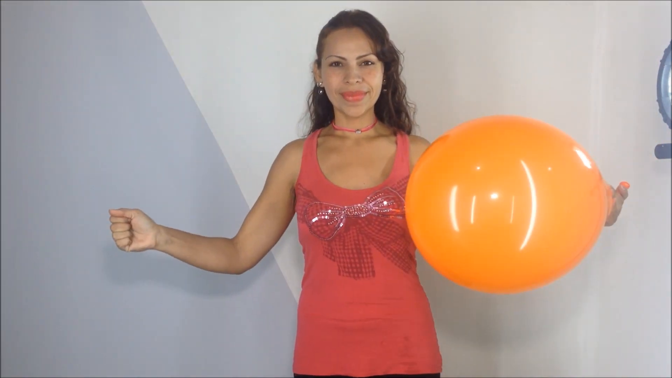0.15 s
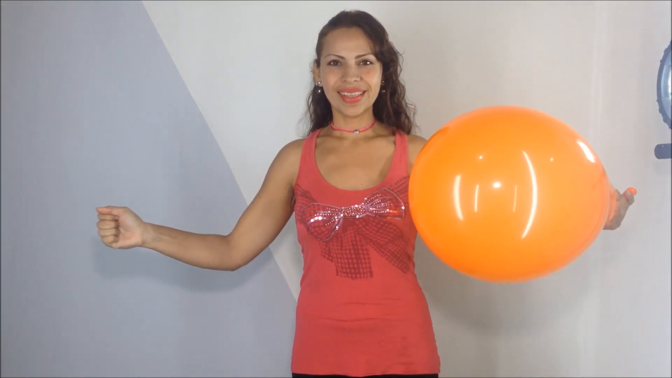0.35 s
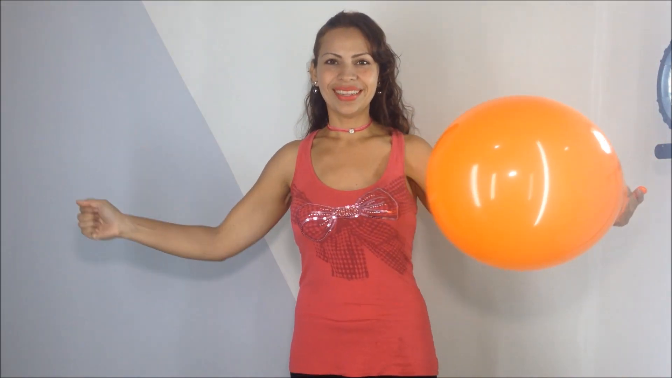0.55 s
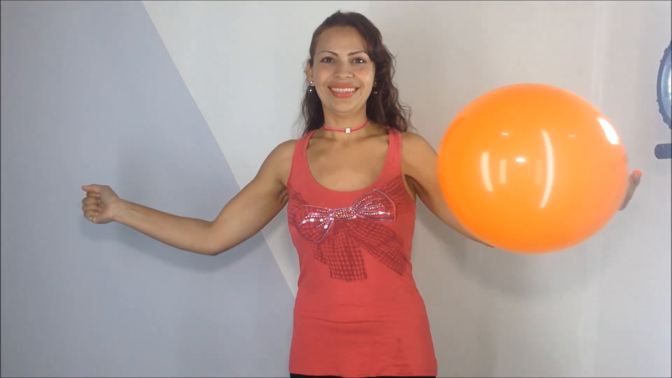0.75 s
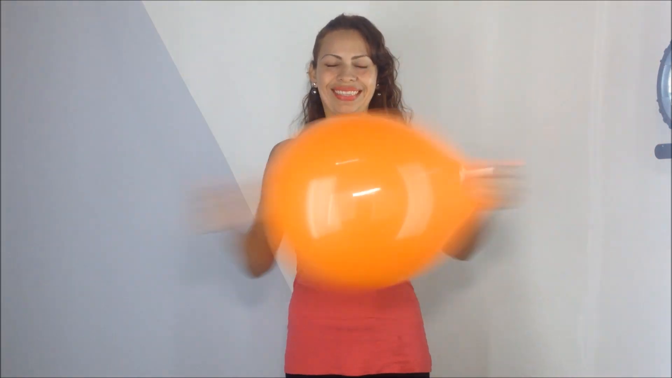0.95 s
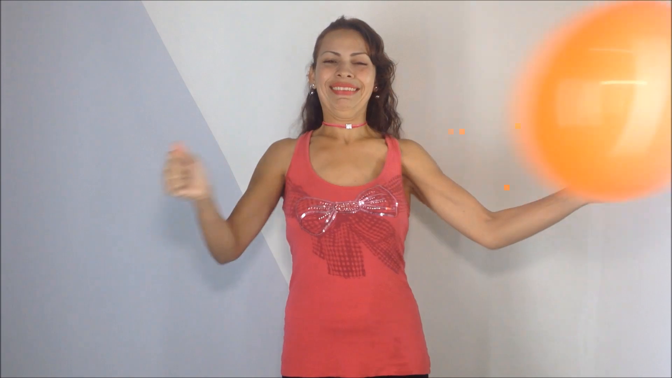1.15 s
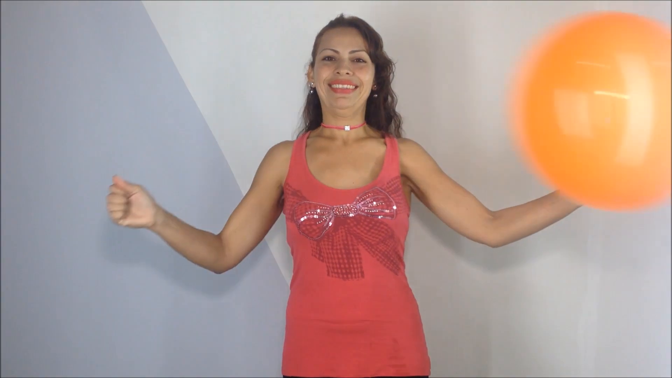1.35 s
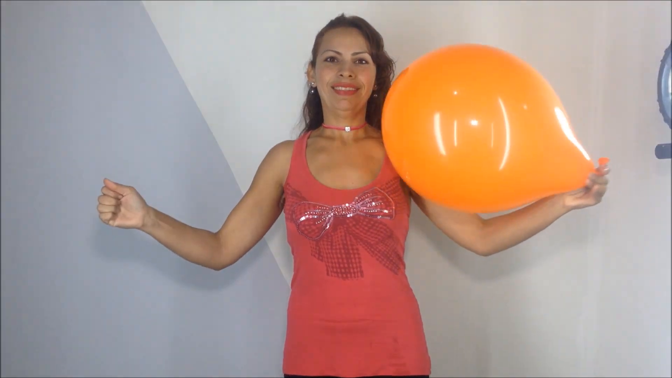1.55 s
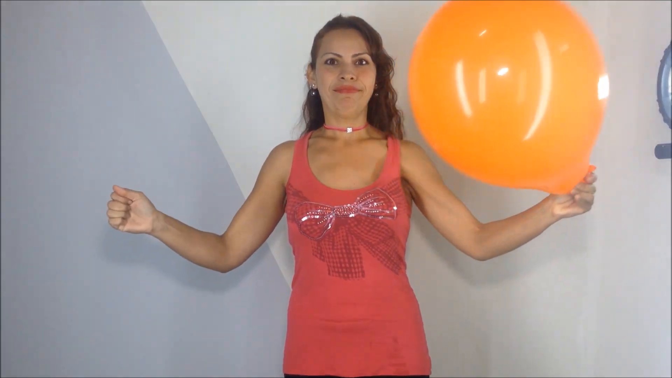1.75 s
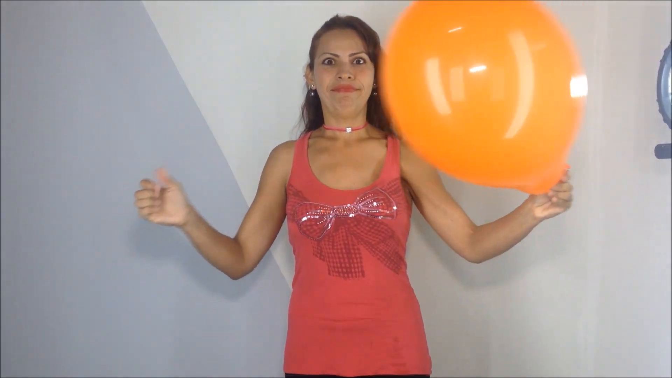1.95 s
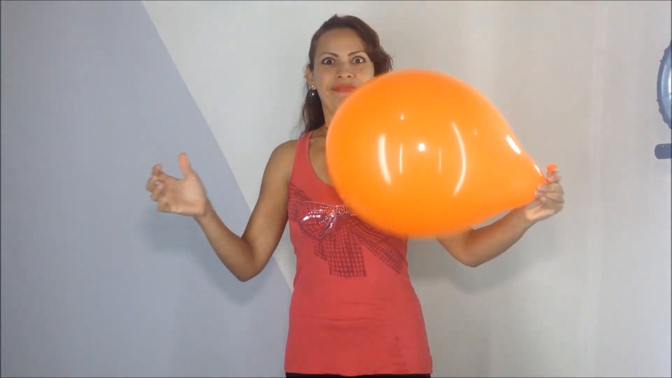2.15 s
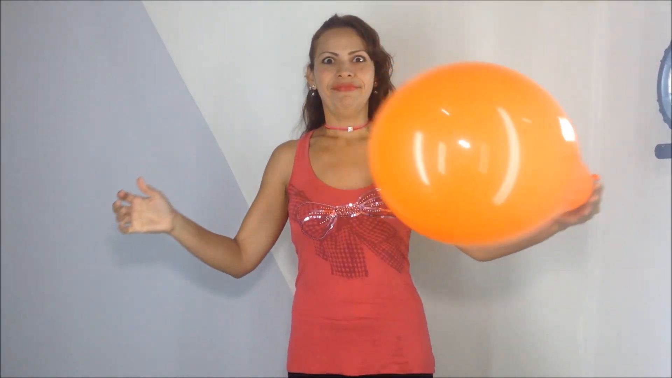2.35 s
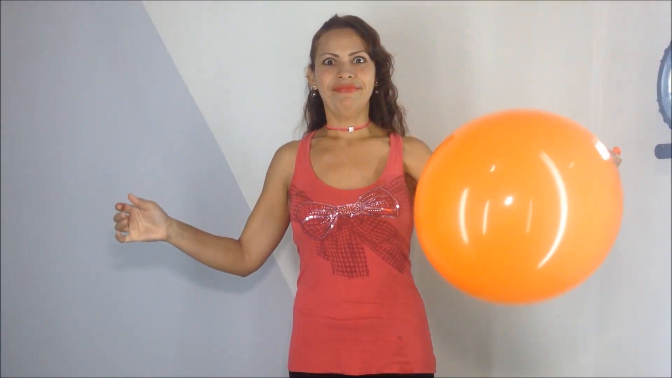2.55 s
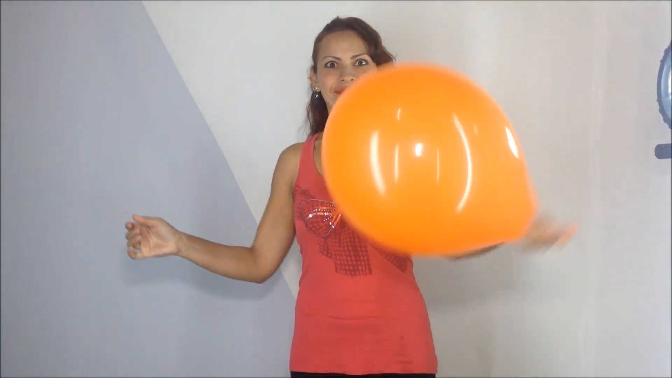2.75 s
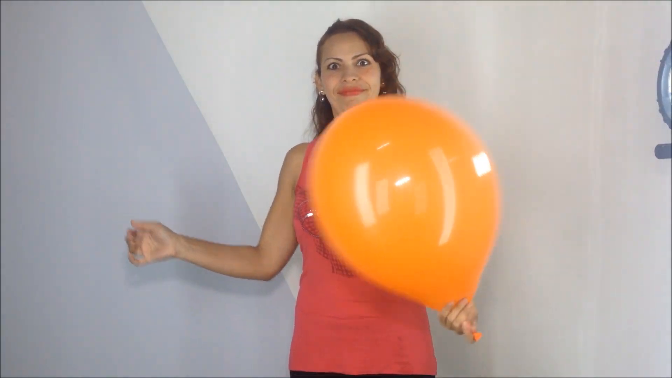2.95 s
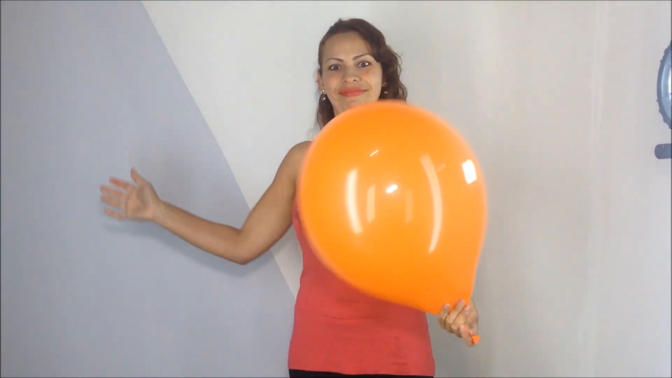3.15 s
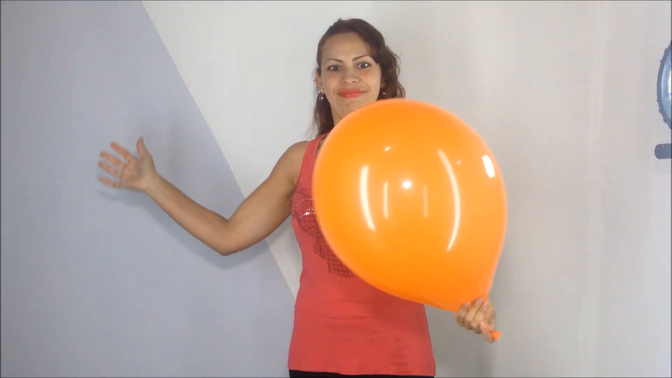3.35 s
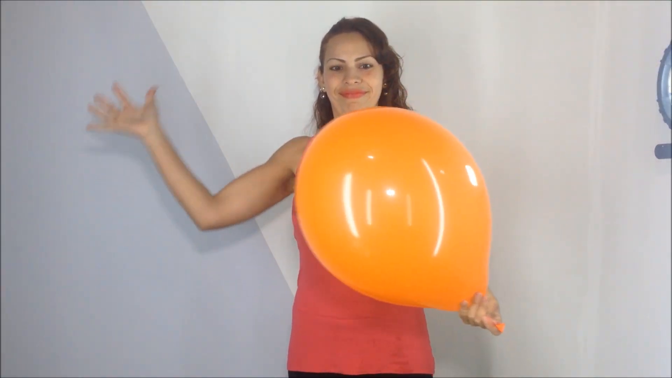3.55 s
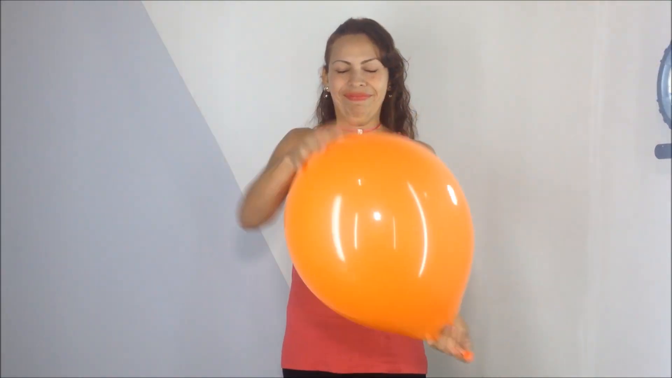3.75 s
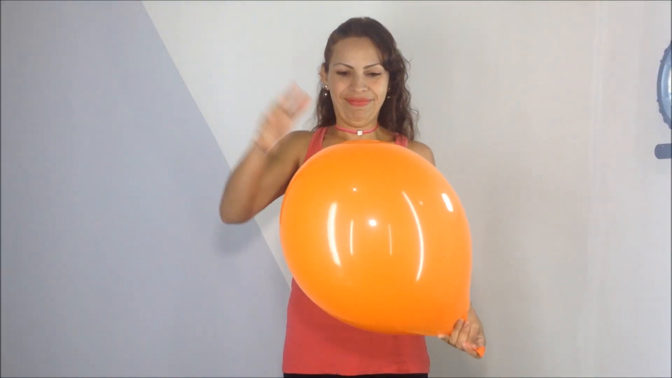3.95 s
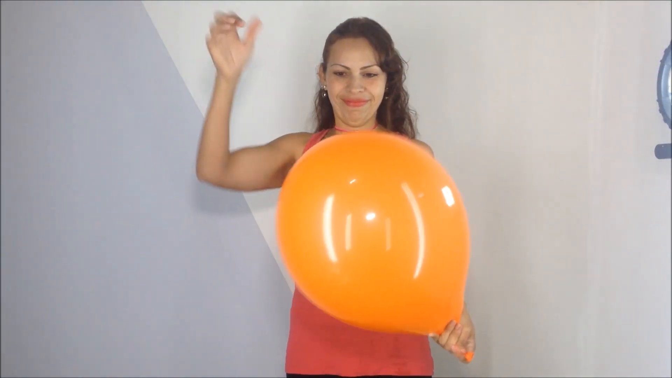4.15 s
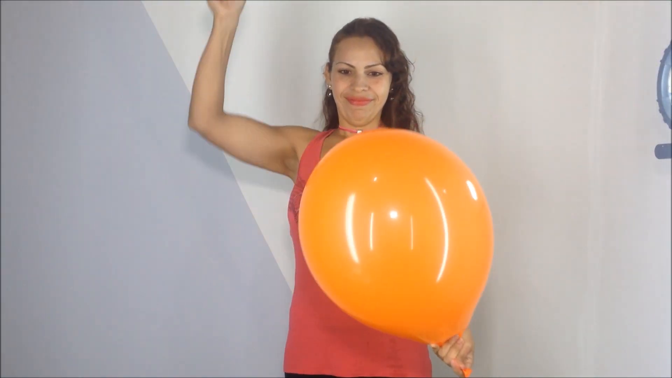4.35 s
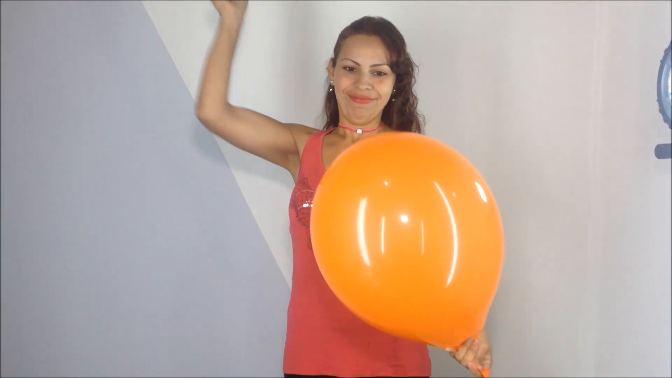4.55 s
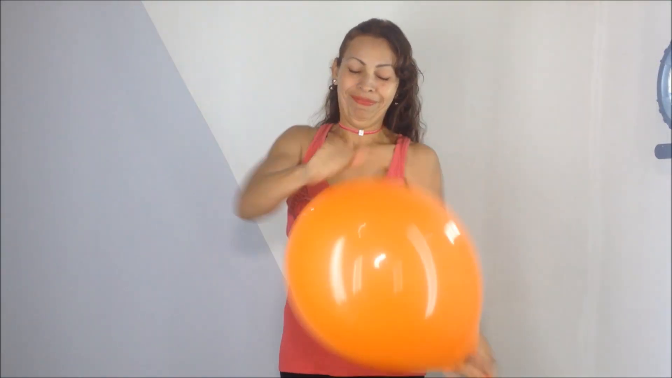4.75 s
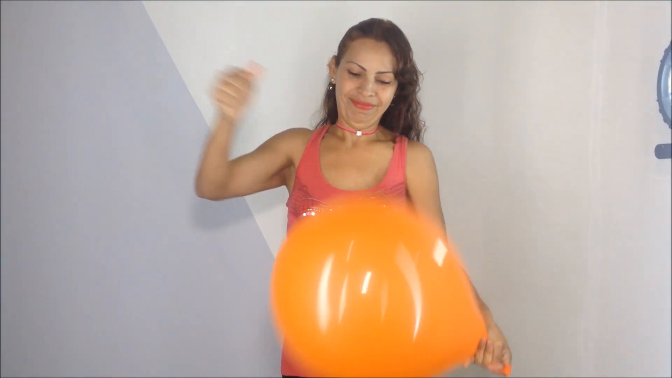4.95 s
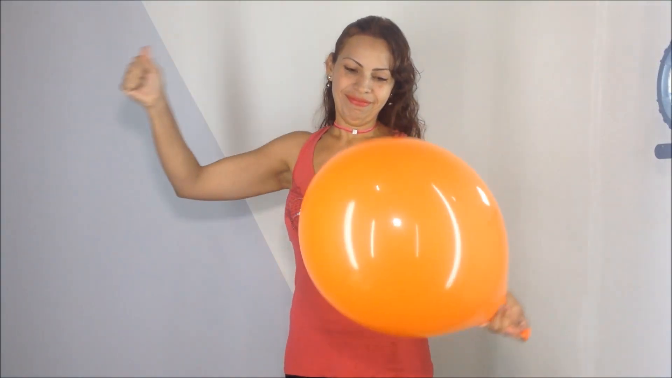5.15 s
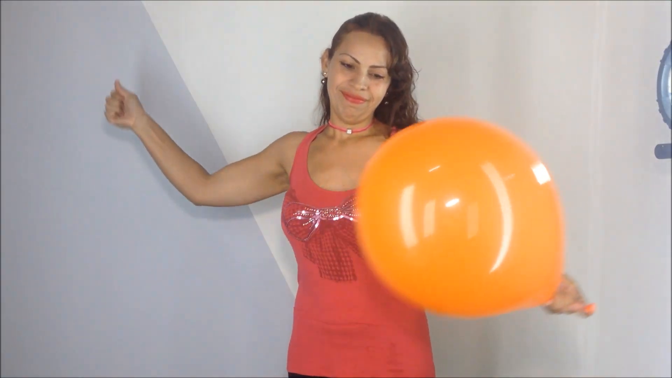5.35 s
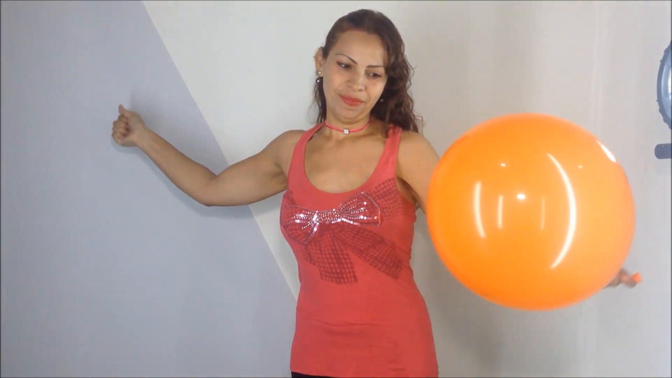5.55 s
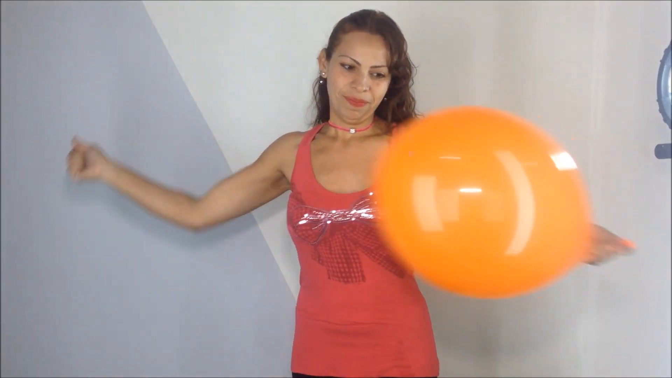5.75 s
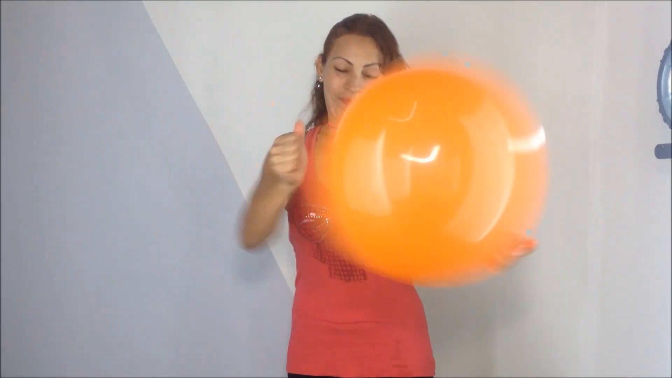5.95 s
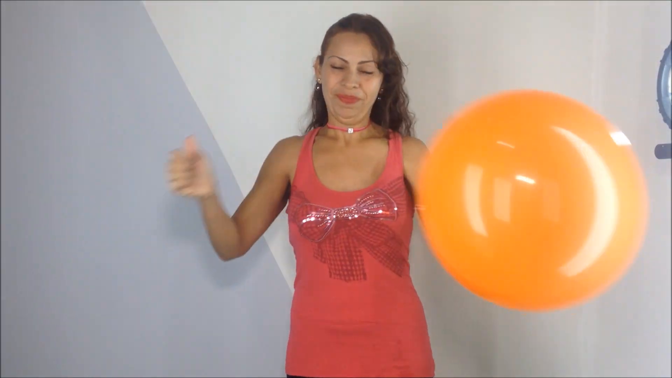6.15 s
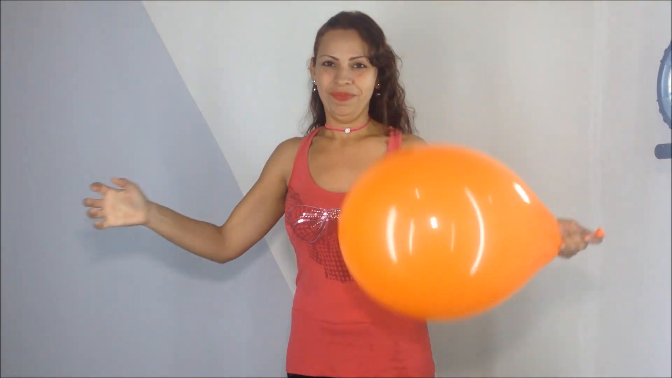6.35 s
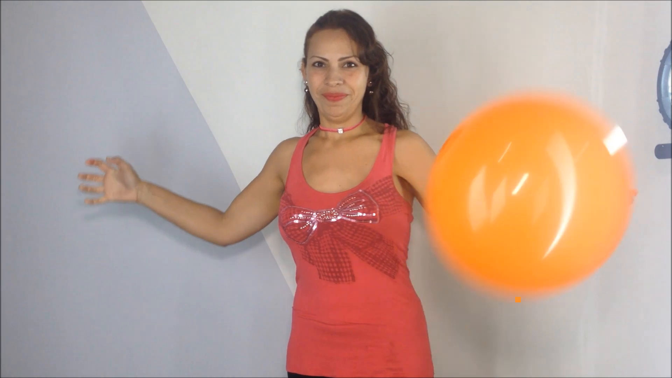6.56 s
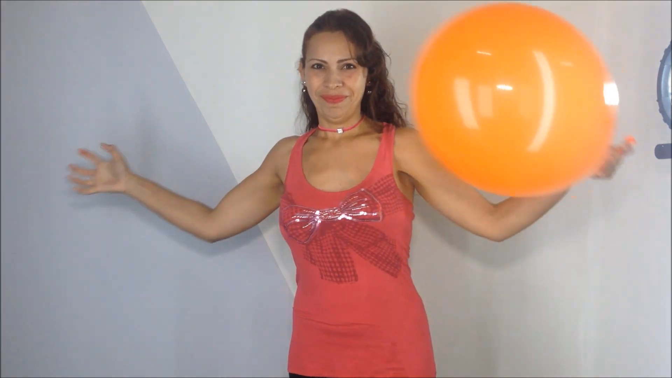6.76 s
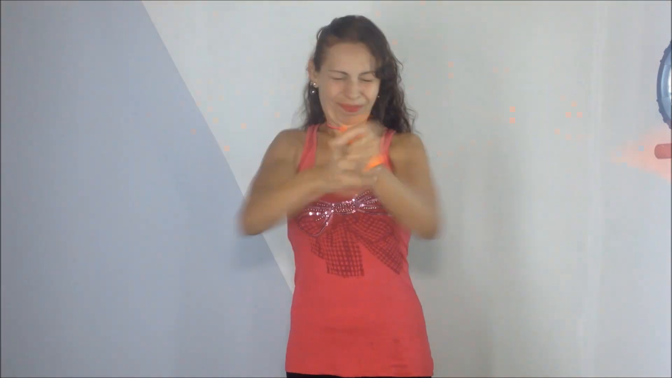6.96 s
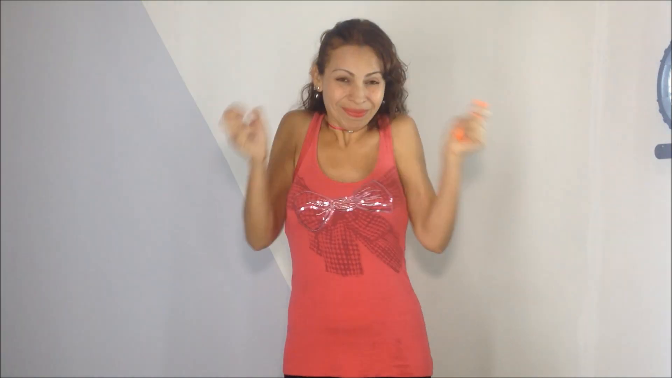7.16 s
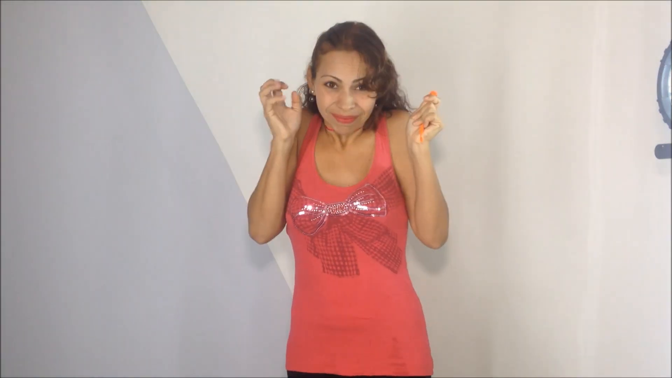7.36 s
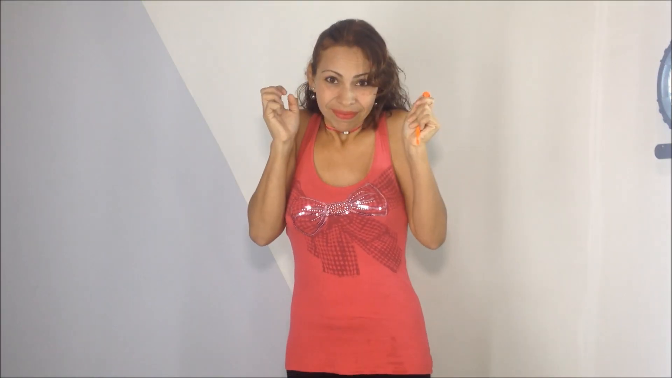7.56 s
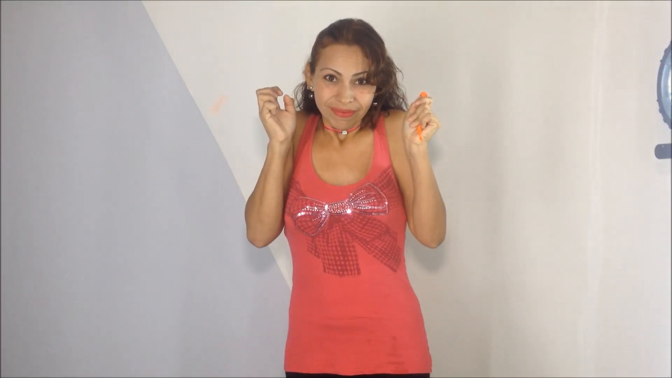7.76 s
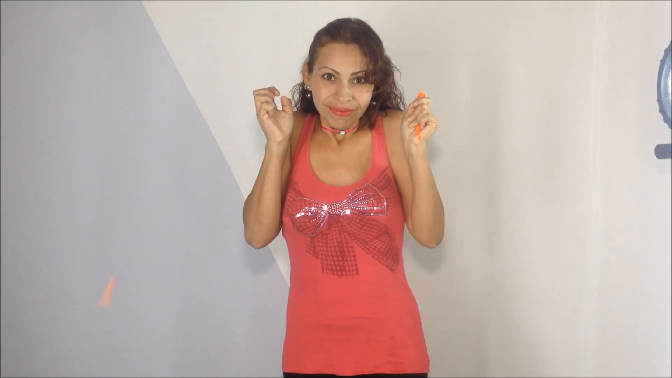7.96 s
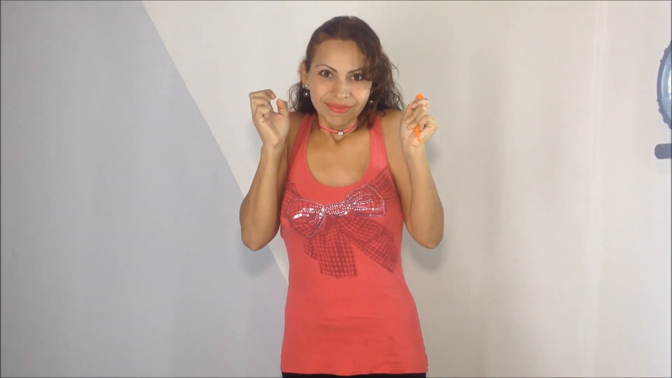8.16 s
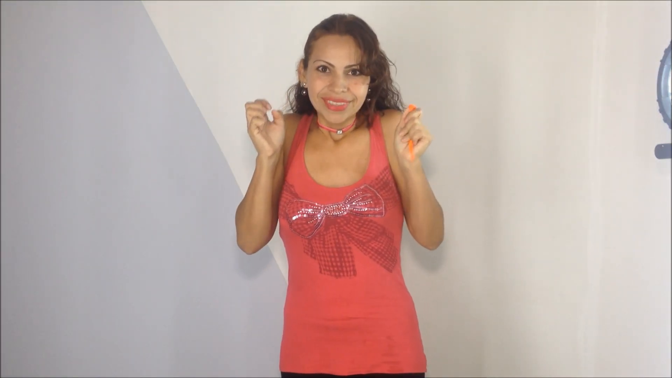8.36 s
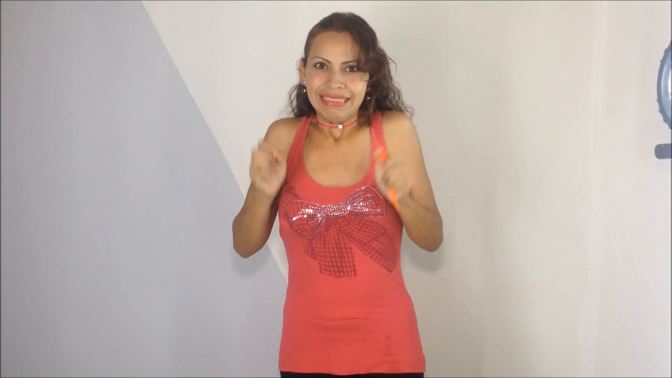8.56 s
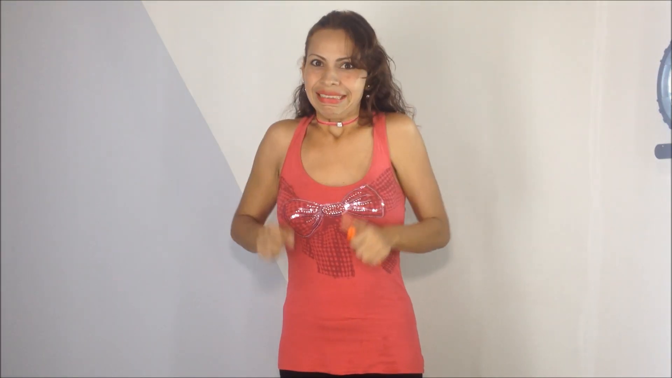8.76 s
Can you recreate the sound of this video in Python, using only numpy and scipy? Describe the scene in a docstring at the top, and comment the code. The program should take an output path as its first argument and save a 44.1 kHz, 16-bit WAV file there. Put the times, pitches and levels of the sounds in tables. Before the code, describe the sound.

In a bare, ringing room, a fist thumps a big balloon once, followed by small rubbery squeaks. Three more hollow punches come about a second apart, then the balloon pops with a loud bang and boom. The microphone, far enough away to catch plenty of echo, distorts and briefly dips in level. A faint clothing rustle follows, while distant traffic murmurs through the walls throughout.

```python
"""A big latex balloon is punched four times in a bare, ringing room and bursts on the fifth blow.
Each punch thuds, slaps and rings the skin; in between, fingers scuff and squeak on the rubber.
The burst cracks, overloads the microphone and pushes its limiter down as a low boom swells up.
Cloth rustles faintly at the end; outside, a far engine drones over the murmur of traffic."""
import sys
import numpy as np
from scipy import signal
from scipy.fft import rfft, irfft
from scipy.io import wavfile
from scipy.ndimage import uniform_filter1d

SR = 44100
rng = np.random.default_rng(int(sys.argv[2]) if len(sys.argv) > 2 else 0)


def transcribe(signal):
    """Save signal, clipped to [-1, 1], as a 16-bit WAV file at the path in sys.argv[1]."""
    frames = np.atleast_2d(signal).T
    limited = np.clip(frames, -1, 1)
    pcm = np.round(limited * 32767).astype(np.int16)
    wavfile.write(sys.argv[1], SR, pcm)


N = 388942
TIME = np.arange(N) / SR


# Knuckles land, the fist sinks in, the balloon rebounds; one row per contact:
# start_s, thud_db, slap_db, low_cut_hz, ring_hz, ring_db, flutter_decay_s
PUNCHES = [(1.101, -22, -9.5, 110, 420, -26, 0.0025), (1.105, -6, -2, 60, 644, -10, 0.0065),
           (1.122, -2, -9, 45, 300, -5, 0.011), (1.150, -3, -3, 45, 206, -2.5, 0.009),
           (1.372, -14.5, -20.5, 110, 195, -17, 0.0074), (3.81, -17, -10, 110, 420, -16, .004),
           (3.8147, -3, 2, 41.6, 548, -8, 0.0067), (3.827, -0.5, -3.5, 42, 734, -7.5, 0.011),
           (3.841, -1.5, -14, 42, 517, -6, 0.013), (3.895, -7.5, -8.5, 60, 284, -11.5, 0.015),
           (4.8034, 1.5, 1.5, 50, 317, -12, 0.0084), (4.822, -0.5, -10.5, 50.3, 347, -2, 0.0077),
           (4.836, -4.5, -10, 50, 223, -5, .008), (4.884, -11, -5, 80, 770, -11, .014),
           (6.008, -8, -2.5, 45, 344, -7, 0.0048), (6.024, -10.5, -11.5, 60, 340, -11, 0.013),
           (6.049, -6.5, -3, 161, 219, -4.5, 0.0068), (6.064, -15, -22, 161, 342, -4.5, 0.0079),
           (6.111, -15.5, -15, 161, 400, -21, 0.0033)]

def punches(hand_db):
    """Every contact of fist, balloon and body sounds in turn; a glancing one lacks bass."""
    out = np.zeros(N)
    for start_s, thud_db, slap_db, low_cut_hz, ring_hz, ring_db, decay_s in PUNCHES:
        hit = contact(thud_db, slap_db, ring_hz, ring_db, decay_s)
        add(out, start_s, low_cut(hit, low_cut_hz))
    return from_db(hand_db) * out


# Weight of the shoved air: freq_hz, level_db
THUD = [(20, -41), (40, -13.5), (60, 1.5), (82, -17), (130, 2.5), (220, 1), (400, -1), (800, -7),
        (1500, -22), (4000, -40), (15000, -78.5)]
# Smack of the skin: freq_hz, level_db
SLAP = [(30, -40.5), (120, -18), (300, -4.5), (700, 1.5), (1100, 2), (1750, -3), (2600, -8.5),
        (4600, -13.5), (5300, -17.5), (8000, -21), (11000, -27.5), (15000, -30.5)]
# Hollow tone of the balloon's air and skin: pitch_hz, level_db, t60_s
BALLOON_MODES = [(205, -1.5, 0.061), (310, -12.5, 0.16), (500, -21, .15), (553, -9, 0.16), (658, 0, 0.23),
                 (755, 2.5, 0.1), (1206, 3, 0.12)]

def contact(thud_db, slap_db, ring_hz, ring_db, decay_s, cavity_db=-14.5, give_s=0.0011, ring_t60_s=0.04):
    """A contact shoves air, smacks the soft skin and rings the balloon, one mode most, by where it lands."""
    t = TIME[:SR // 2]
    push = flutter(decay_s, snap=0, attack_s=give_s)
    cavity = signal.fftconvolve(push, ringing(BALLOON_MODES, t))[:len(t)]
    thud = coloured(push, THUD) + from_db(cavity_db) * cavity
    slap = coloured(flutter(decay_s, snap=0, attack_s=give_s), SLAP)
    pitch_hz = ring_hz * (1 + 0.12 * np.exp(-t / 0.004))  # sharp while the dent stretches the skin
    phase = 2 * np.pi * np.cumsum(pitch_hz) / SR
    ring = unit_energy(np.sin(phase) * from_db(-60 * t / ring_t60_s))
    return from_db(thud_db) * thud + from_db(slap_db) * slap + from_db(ring_db) * ring


def flutter(decay_s, snap, attack_s=1e-5):
    """An optional snap, then the slack skin flapping ever more weakly; equally strong at all pitches."""
    t = TIME[:SR // 2]
    envelope = np.exp(-t / decay_s) * (1 - np.exp(-(t + 1 / SR) / attack_s))
    flaps = unit_energy(rng.standard_normal(len(t)) * envelope)
    flaps[0] += snap
    for _ in range(4):  # flatten the spectrum while keeping the hit short
        white = irfft(np.exp(1j * np.angle(rfft(flaps))), len(t))
        flaps = white * np.minimum(1, 10 * envelope)
    return unit_energy(flaps)


# Bright rip of the latex: freq_hz, level_db
TEAR = [(40, -43), (100, -20.5), (170, -4.5), (400, 1.5), (700, 1.5), (1400, -5.5), (2300, -3.5),
        (3100, -2), (4700, 1), (5150, -4), (7200, -3), (10000, -10), (15000, -12)]
# Colour of the low boom: freq_hz, level_db
BOOM_COLOUR = [(40, -42), (90, -35), (150, -1.5), (270, 3), (400, 7), (700, 1), (1000, -7.5), (1500, -15),
               (4000, -50)]
# Four layers of the bang: start_s, level_db, decay_s
SPLIT = (7.061, -13, .005)
CRACK, BOOM, FLARE = (7.0685, 24.56, .014), (7.155, 15.1, .022), (7.195, 5.4, 0.017)

def burst(burst_db):
    """The skin splits and tears open; a low boom swells up after the crack and the treble flares again."""
    out = np.zeros(N)
    layers = (SPLIT, SLAP), (CRACK, TEAR), (BOOM, BOOM_COLOUR), (FLARE, TEAR)
    for (start_s, level_db, decay_s), spectrum in layers:
        layer = coloured(flutter(decay_s, snap=0.14), spectrum)
        add(out, start_s, from_db(level_db + burst_db) * layer)
    return out


# Low end under each blow: start_s, level_db, pitch_hz, swell_s
THROBS = [(1.11, -5, 60, .025), (3.818, 1, 57, 0.023), (4.81, -3, 60, 0.017), (6.01, -8, 60, .014),
          (7.172, 33.5, 275, .007)]

def throbs():
    """The whole balloon throbs for a few heavy cycles under each punch; a low swell follows the burst."""
    out, t = np.zeros(N), TIME[:SR // 2]
    for start_s, level_db, pitch_hz, swell_s in THROBS:
        throb = np.sin(2 * np.pi * pitch_hz * t) * t * np.exp(-t / swell_s)
        add(out, start_s, from_db(level_db) * unit_energy(throb))
    return out


# Fingers slipping on the latex: peak_s, scuff_db, squeak_db, rise_s, pitch_hz
RUBS = [(1.373, -29.5, -27, .003, 1060), (1.53, -40.5, -34.5, 0.013, 2300), (1.6, -42, -35.5, 0.023, 1200),
        (1.891, -42, -42, .02, 2060), (2.305, -39.5, -39, 0.0047, 2000), (2.375, -38, -28.5, 0.019, 1810),
        (2.45, -37.5, -48, .01, 2600), (2.685, -47, -32.5, 0.0097, 1160), (2.894, -40, -50.5, .006, 2997),
        (5.979, -33.5, -33, 0.00079, 2000), (6.447, -42, -23.5, .0015, 2020),
        (6.97, -32, -19, 0.0011, 2140)]
# Colour of the scuff: freq_hz, level_db
RUBBER = [(100, -14.5), (700, 0.5), (1500, 4), (2400, 2.5), (3300, 0.5), (5000, -3), (9000, -12),
          (15000, -14)]
# Broad resonance of the squeak, steep on top: pitch_ratio, level_db
SQUEAK = [(.08, -18), (.22, -4), (.45, -3), (.65, 0.5), (1.22, 0), (1.55, -11), (3, -24.5), (7, -41)]

def rubs(slips_per_s, finger_db, squeak_lag_s=0.0068):
    """Latex sticks and slips in uneven ticks: a bright scuff, then the stretched patch's warmer squeak."""
    out, t = np.zeros(N), TIME[:SR // 2]
    for peak_s, scuff_db, squeak_db, rise_s, pitch_hz in RUBS:
        lead_s = 3 * rise_s
        decay_s = 0.005 + 0.9 * rise_s  # a slowly building rub also dies slowly
        pressure = np.exp(np.minimum((t - lead_s) / rise_s, (lead_s - t) / decay_s))
        stretch = signal.lfilter([1], [1, -np.exp(-1 / (squeak_lag_s * SR))], pressure)
        slips = (rng.random(len(t)) < slips_per_s / SR) * rng.standard_normal(len(t))
        scuff = unit_energy(coloured(slips * pressure, RUBBER))
        resonance = [(pitch_hz * ratio, db) for ratio, db in SQUEAK]
        squeak = unit_energy(coloured(slips * stretch, resonance))
        add(out, peak_s - lead_s, from_db(scuff_db) * scuff + from_db(squeak_db) * squeak)
    return from_db(finger_db) * out


# Standing waves between the walls: pitch_hz, level_db, t60_s
ROOM_MODES = [(59.2, -8, 0.75), (118, -9, .9), (149.2, -7, 1.7), (185.7, -2.5, 1.3), (204.4, -1, 1.05),
              (238, -2, .95), (282.8, -3.5, 1), (326, -1, .8), (351, -4.5, 0.78), (384.8, -2.5, 1.05),
              (421.5, -6.5, 1), (491, -4.5, 0.71), (518, -4.5, .95), (585, -10, 0.89), (679, -4.5, 0.69),
              (784, -5, 0.65)]
# Tone of the diffuse tail, which yields to the standing waves in the bass: freq_hz, level_db
DIFFUSE = [(90, -2), (160, -1.5), (280, 1), (400, 1), (600, 0), (900, -0.5), (1250, 1), (2500, 0.5)]
# Ring time of the tail: freq_hz, t60_s
ROOM_T60 = [(50, 0.49), (170, 1.0), (350, 0.8), (700, 0.71), (1500, 0.66), (3500, 0.66), (7000, 0.53),
            (14000, 0.38)]
# The balloon is swung to a new place for each span between these marks: time_s
MOVES_S = [1, 1.36, 3.7, 4.7, 5.9, 6.4, 7.05, 7.7]

def room(x, direct_db, modes_db, clumping_db, build_s, echoes_per_s):
    """Direct sound, standing waves and uneven wall echoes that thicken into a tail dying band by band."""
    t = TIME[:SR]
    density = np.clip(echoes_per_s / SR * (1 + (t / .012) ** 2), 1e-3, 1)
    early_lift = 1 + 0.61 * np.exp(-t / 0.045)  # the near walls answer more strongly at first
    onset = (1 - np.exp(-t / build_s)) * early_lift
    bins_hz = np.fft.rfftfreq(len(t), 1 / SR)
    centres_hz = np.geomspace(40, 16000, 18)
    bands = [at_hz(np.c_[centres_hz, weights], bins_hz) for weights in np.eye(len(centres_hz))]
    envelopes = [onset * from_db(at_hz(DIFFUSE, hz) - 60 * t / at_hz(ROOM_T60, hz)) for hz in centres_hz]
    standing = from_db(modes_db) * ringing(ROOM_MODES, t)
    out = from_db(direct_db) * x
    for start_s, end_s in zip(MOVES_S, MOVES_S[1:]):  # fresh echoes for each place
        clumps = from_db(clumping_db * wander(110)[:len(t)])
        strengths = clumps * rng.standard_normal(len(t))
        arrivals = rng.random(len(t)) < density
        echo_spectrum = rfft(strengths * arrivals / np.sqrt(density))
        tail = np.zeros(len(t))
        for band, envelope in zip(bands, envelopes):
            band_gain = np.sqrt(np.mean(band ** 2) * np.sum(envelope ** 2))
            tail += band_gain * unit_energy(irfft(echo_spectrum * band) * envelope)
        span = x[round(start_s * SR):round(end_s * SR)]
        add(out, start_s, signal.fftconvolve(span, unit_energy(tail) + standing))
    return out


# Colour of cloth and necklace: freq_hz, level_db
RUSTLE = [(200, -5), (1500, -5), (3000, -3.5), (5500, -5), (7200, -7.5), (7800, -0.5), (8500, -14),
          (15000, -16.5)]

def rustle(start_s, attack_s, level_db):
    """Cloth and necklace brush faintly and unevenly as the arms come down."""
    fade_in = np.clip((TIME - start_s) / attack_s, 0, 1)
    brushing = from_db(level_db + 3.1 * wander(40))
    return fade_in * brushing * coloured(rng.standard_normal(N), RUSTLE)


# Two pulls of the far engine, one curve each: time_s, firing_hz, level_db
PULLS = [
    [(1.5, 79.05, -62), (1.66, 80.8, -43), (1.9, 82.25, -50), (2.02, 87.25, -48), (2.17, 88.5, -42),
     (2.4, 91, -49), (2.8, 95.5, -49), (2.96, 92.1, -46.5), (3.08, 76, -46.5), (3.2, 75.3, -52),
     (3.35, 74, -67)],
    [(5.08, 75.8, -58), (5.3, 76.5, -42), (5.6, 77.86, -45), (5.9, 78.6, -45), (6.4, 77.46, -44),
     (6.7, 80, -48.5), (6.9, 87, -53), (7.0, 88, -62)],
]
# Low exhaust orders that pass the walls: firing_multiple, level_db
EXHAUST = [(2, 0), (3, -12), (4, -17), (5, -20)]
# Room resonances that the drone excites: centre_hz, width_hz, boost_db
DRONE_RESONANCES = [(254.4, 7.5, 12), (389.5, 18, 11)]

def engine(waver_db, jitter_hz):
    """The engine gathers speed in steps and drops back; its orders swell as they cross a room resonance."""
    out = np.zeros(N)
    for pull in PULLS:
        time_s, firing_hz, level_db = np.transpose(pull)
        pitch_hz = np.interp(TIME, time_s, firing_hz) + jitter_hz * wander(27)
        phase = 2 * np.pi * np.cumsum(pitch_hz) / SR
        drone = sum(np.sin(order * phase) * from_db(db + waver_db * wander(18)) for order, db in EXHAUST)
        envelope = np.interp(TIME, time_s, from_db(level_db), left=0, right=0)
        out += np.sqrt(2) * envelope * drone
    return resonant(out, DRONE_RESONANCES)


# Dark bed of street noise: freq_hz, level_db
TRAFFIC = [(25, -41.5), (75, -23), (115, -6.5), (180, 1), (290, -1), (350, -8), (400, -3.5), (500, -8.5),
           (660, -7), (1100, -16.5), (1700, -23.5), (4700, -30), (5300, -34), (10000, -42.5), (15500, -46)]

def traffic(level_db):
    """A steady murmur of traffic, dulled by the walls."""
    return from_db(level_db) * coloured(rng.standard_normal(N + SR), TRAFFIC)[SR:]


def from_db(db):
    """Decibels to gain."""
    return 10 ** (np.asarray(db) / 20)


def unit_energy(x):
    """Scale so that the squares add up to one."""
    return x / np.sqrt(np.sum(x ** 2) + 1e-20)


def at_hz(points, hz):
    """Read a table on a log-frequency axis."""
    known_hz, values = np.transpose(points)
    return np.interp(np.log(np.maximum(hz, 1)), np.log(known_hz), values)


def coloured(x, spectrum, size=4096):
    """Minimum-phase EQ with this spectrum; white noise keeps its power."""
    gains = from_db(at_hz(spectrum, np.fft.rfftfreq(size, 1 / SR)))
    cepstrum = irfft(np.log(gains))
    cepstrum[1:size // 2] *= 2
    cepstrum[size // 2 + 1:] = 0
    impulse = unit_energy(irfft(np.exp(rfft(cepstrum))))
    return signal.fftconvolve(x, impulse)[:len(x)]


def low_cut(x, hz, order=2):
    """Roll off the bass."""
    return signal.sosfilt(signal.butter(order, hz, "high", fs=SR, output="sos"), x)


def resonant(x, resonances):
    """Each resonance lifts a narrow band of the sound."""
    for hz, width_hz, boost_db in resonances:
        band = signal.lfilter(*signal.iirpeak(hz, hz / width_hz, fs=SR), x)
        x = x + (from_db(boost_db) - 1) * band
    return x


def ringing(modes, t):
    """Sum of dying sines, one per mode."""
    sines = (from_db(db - 60 * t / t60_s) * np.sin(2 * np.pi * hz * t) for hz, db, t60_s in modes)
    return unit_energy(sum(sines))


def wander(rate_hz):
    """Smooth random drift with a spread near one."""
    knots = rng.standard_normal(N // 100)
    return np.interp(TIME * rate_hz, np.arange(len(knots)), knots)


def add(track, start_s, sound):
    """Mix a sound into the track."""
    start = round(start_s * SR)
    track[start:start + len(sound)] += sound[:N - start]


def scene():
    """The balloon in the room, far enough off for the echoes to outweigh it, and the street behind."""
    balloon = punches(hand_db=14.0) + rubs(slips_per_s=2200, finger_db=16.5) + burst(burst_db=28.0)
    mix = room(balloon, direct_db=-9.5, modes_db=-19.5, clumping_db=1.5, build_s=0.0012, echoes_per_s=1200)
    mix += throbs()  # kept free of echoes
    mix += rustle(start_s=8.5, attack_s=0.066, level_db=-62.5)
    mix += traffic(level_db=-44.5) + engine(waver_db=3.5, jitter_hz=0.6)
    return mix[None]


# Resonances of the housing around the microphone: centre_hz, width_hz, boost_db
HOUSING = [(2380, 120, 1.5), (3070, 71, 1.1), (4620, 170, 2.5)]

def microphone(x, overload_db, bias):
    """The housing colours the sound; the capsule saturates, sooner on one side, so the bang rumbles."""
    headroom = from_db(overload_db)
    drive = resonant(x, HOUSING) / headroom
    saturated = headroom * (np.tanh(drive + bias) - np.tanh(bias)) * np.cosh(bias) ** 2
    return low_cut(saturated, hz=30)


def limiter(x, ceiling_db, release_s, sidechain_cut_hz):
    """The gain drops at once when the level above the bass passes the ceiling, then creeps back."""
    sidechain = low_cut(x, sidechain_cut_hz, order=1)
    level_db = 10 * np.log10(np.maximum(uniform_filter1d(sidechain ** 2, size=160), 1e-12))
    over_db = np.maximum(level_db - ceiling_db, 1e-9)
    release = TIME / release_s  # each peak's reduction dies away exponentially
    reduction_db = np.exp(np.maximum.accumulate(np.log(over_db) + release, axis=-1) - release)
    return x * from_db(-uniform_filter1d(reduction_db, size=40))


def record(dry):
    """A quick limiter and a slow one hold the bang down and duck the street; peaks and top are trimmed."""
    picked_up = microphone(dry, overload_db=24.5, bias=.22)
    held = limiter(picked_up, ceiling_db=16.0, release_s=0.016, sidechain_cut_hz=300)
    ducked = limiter(held, ceiling_db=-6.0, release_s=0.66, sidechain_cut_hz=500)
    soft_clipped = ducked / (1 + ducked ** 6) ** (1 / 6)
    high_cut = signal.ellip(10, .2, 80, 15450, fs=SR, output="sos")
    return signal.sosfilt(high_cut, soft_clipped)


dry = scene()
out = record(dry)
transcribe(out)
```